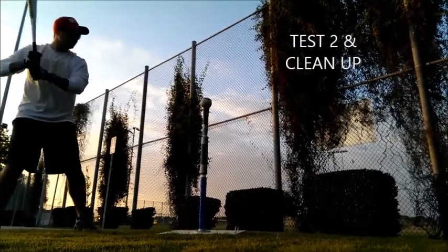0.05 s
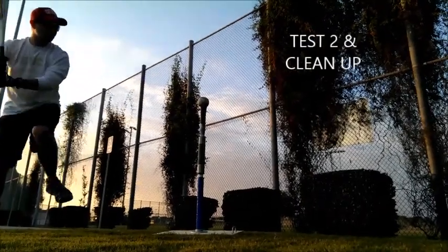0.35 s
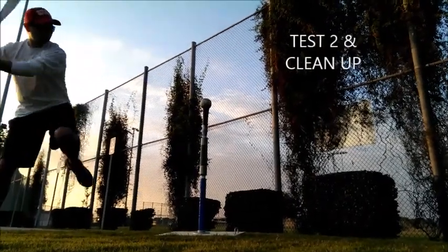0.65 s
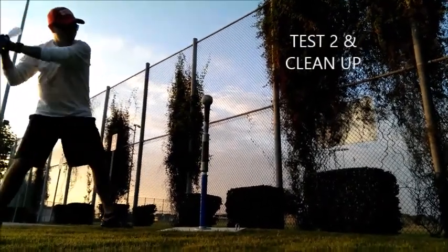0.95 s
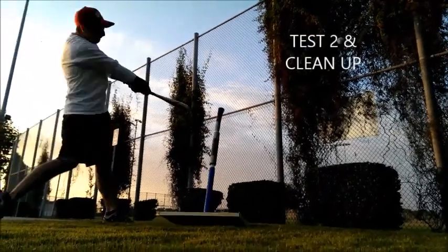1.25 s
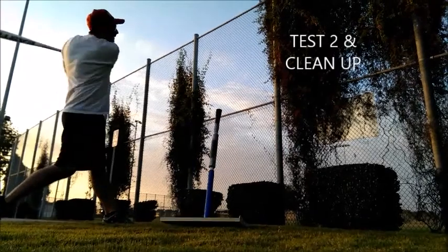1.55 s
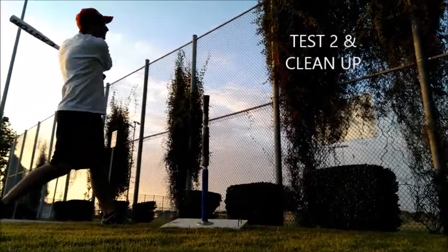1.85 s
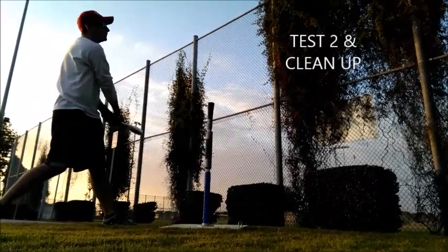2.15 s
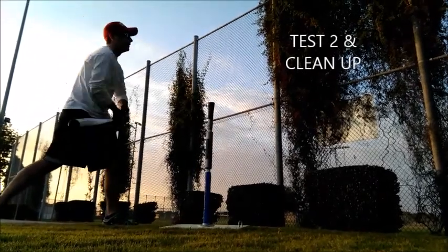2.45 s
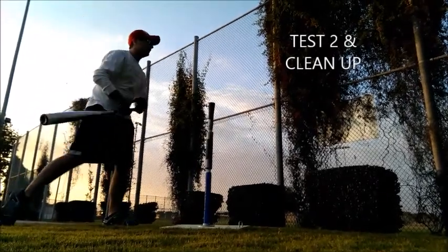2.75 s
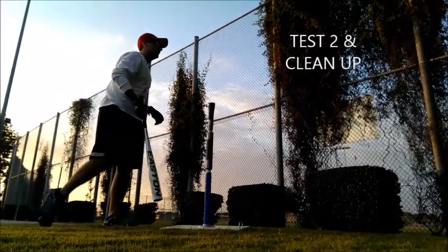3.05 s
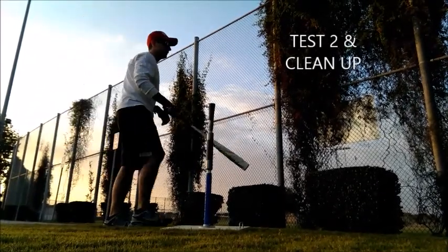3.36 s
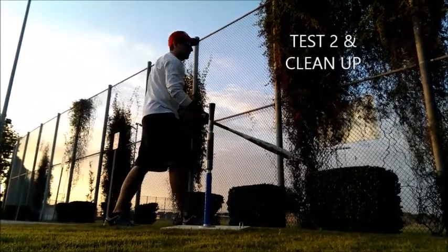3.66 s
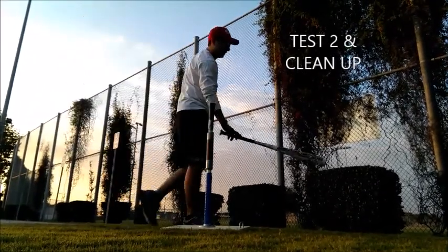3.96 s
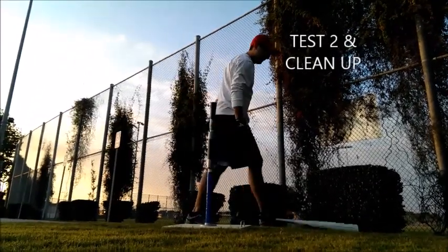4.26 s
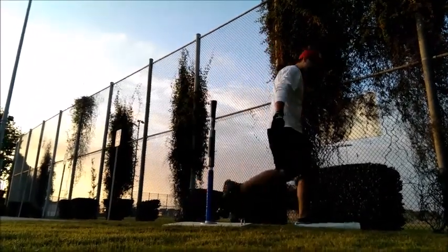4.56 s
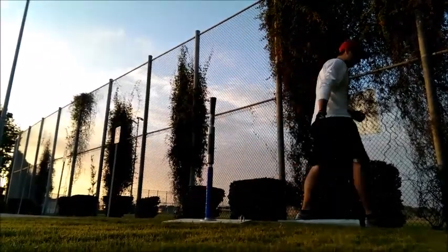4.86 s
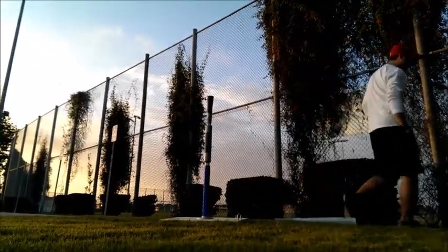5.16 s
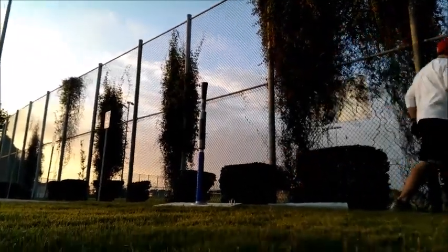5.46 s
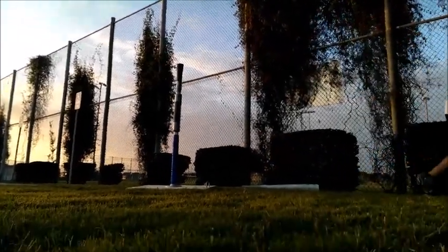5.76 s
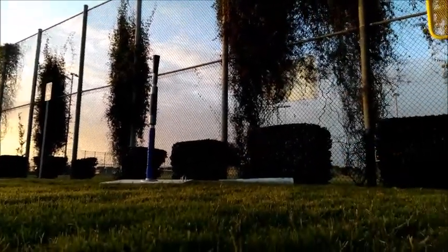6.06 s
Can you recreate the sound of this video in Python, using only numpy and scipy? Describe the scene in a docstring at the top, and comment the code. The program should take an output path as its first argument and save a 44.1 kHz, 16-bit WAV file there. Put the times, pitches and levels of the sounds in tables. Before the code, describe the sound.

A faint rumble of distant traffic runs throughout, heard outdoors from ground level. In the first second, shoes shift quietly on grass and clothing rubs. At about 1.3 seconds a metal bat hits a ball off a tee with a loud, sharp crack and a brief ringing ping. At about 1.6 seconds the ball slams into a chain-link fence, nearly as loud; the mesh chatters and jingles brightly, thinning to a shimmer that dies away by about 2.5 seconds. Leaves and grass rustle faintly afterwards, with tiny ticks. Soft steps swish through the grass from about 2.3 seconds, with one heavier, low thud near 2.6. At about 4.3 seconds the bat drops on the turf with a dull double thud and a very slight ring. A few faint footsteps continue until the end, at around 6 seconds.

```python
"""A sharp crack and ping of a bat, then a slam and jingle of chain-link: batting practice on grass.
The bat knocks a ball off a tee and its barrel rings; the ball drives into a tall fence, whose wire
mesh chatters and settles to a shimmer. The batter swishes through the grass, drops the bat on the turf
and walks off. Leaves rustle and distant traffic rumbles underneath, all heard from ground level."""
import sys
import numpy as np
from scipy import signal
from scipy.fft import rfft, irfft, next_fast_len
from scipy.io import wavfile

SR = 44100
rng = np.random.default_rng(int(sys.argv[2]) if len(sys.argv) > 2 else 0)


def int16_out(signal):
    """Quantize to a 16-bit WAV file."""
    q = np.round(np.clip(np.atleast_2d(signal).T, -1, 1) * 32767)
    wavfile.write(sys.argv[1], SR, q.astype(np.int16))


N = 274302
TIME = np.arange(N) / SR

# ball on the fence, then the mesh slapping back: t/s, level/dB, tilt/(dB per octave)
FENCE_BLOWS = [(1.5773, 4.5, -1), (1.583, -13, 5), (1.5917, -4, -3), (1.6448, -18, -4)]
# bright colour shared by grass, leaves and the fence's shimmer: f/Hz, relative level/dB
RUSTLE_COLOUR = [(1500, -2.5), (3500, -7.5), (6500, -4.5), (8500, -2.5), (10500, -0.5), (12000, -3.5),
                 (13500, -9), (16000, -15)]


def from_db(db):
    """Decibels to gain."""
    return 10 ** (np.asarray(db) / 20)


def rms_one(x):
    """Scale a sound to rms 1."""
    return x / np.sqrt(np.mean(x ** 2) + 1e-20)


def at_hz(points, hz):
    """Read a curve on a log-frequency axis."""
    freqs, values = np.transpose(points)
    return np.interp(np.log(np.maximum(hz, 1)), np.log(freqs), values)


def in_time(points):
    """Join the points of an envelope with straight lines."""
    return np.interp(TIME, *np.transpose(points))


def bins(size):
    """FFT bin frequencies in Hz."""
    return np.arange(size // 2 + 1) * SR / size


def add(out, s, sound):
    """Mix a short sound in at time s."""
    start = int(round(s * SR))
    out[:, start:start + sound.shape[-1]] += sound[..., :N - start]


def drift(rate):
    """Random wander of spread 1, with `rate` turning points a second."""
    knots = rng.standard_normal(8192)
    return np.interp(TIME * rate % 8191, np.arange(8192), knots) * np.sqrt(3 / 2)


def wavering(rate):
    """Amplitude and phase of a tone that reaches each side by many paths."""
    return np.array([drift(rate) + 1j * drift(rate) for side in range(2)]) / np.sqrt(2)


def bell(s, width):
    """An envelope that swells up to time s and falls away again."""
    return np.exp(-.5 * np.minimum(((TIME - s) / width) ** 2, 100))


def dying(start, rise, t60):
    """An envelope that builds from the start and then decays; times in s."""
    age = np.maximum(TIME - start, 0)
    return (1 - np.exp(-age / rise)) * from_db(-60 * age / t60)


def fader(points):
    """Gain that rides a dB curve about its mean."""
    db = in_time(points)
    return from_db(db - db.mean())


def below(x, hz):
    """The part of a sound under one frequency."""
    return signal.sosfiltfilt(signal.butter(2, hz, fs=SR, output="sos"), x)


def noise(colour):
    """Diffuse coloured noise, narrow in the bass and wide in the treble; rms 1."""
    # stereo image of the open air: f/Hz, left-right correlation
    likeness = [(60, 0.94), (130, 0.96), (290, 0.82), (640, 0.315), (1400, 0), (3100, 0), (7000, 0.049),
                (16000, 0)]
    size = next_fast_len(N, real=True)
    hz = bins(size)
    mid, side = rfft(rng.standard_normal((2, size)))
    alike = np.clip(at_hz(likeness, hz), -1, 1)
    stereo = np.sqrt(1 + alike) * mid + np.sqrt(1 - alike) * side * [[1], [-1]]
    low_cut = 1 / np.hypot(1, (colour[0][0] / (hz + 1)) ** 2)
    high_cut = 1 / np.hypot(1, (hz / colour[-1][0]) ** 4)
    return rms_one(irfft(stereo * low_cut * high_cut * from_db(at_hz(colour, hz)), size)[:, :N])


def band_noise(hz, octaves, size=N):
    """Stereo noise around one frequency; rms 1."""
    edges = np.clip([hz / 2 ** (octaves / 2), hz * 2 ** (octaves / 2)], 20, SR * .47)
    band = signal.butter(2, edges, "band", fs=SR, output="sos")
    return rms_one(signal.sosfilt(band, rng.standard_normal((2, size))))


def traffic():
    """A distant road: deep rumble, engine drone and tyre noise, with a wavering engine hum."""
    # colour of the road: f/Hz, relative level/dB
    road_colour = [(13, -56), (22, -27), (30, -22), (41, -9), (75, -2), (91, -2), (113, -2), (172, -4),
                   (242, -4), (347, -10.5), (487, -16.5), (641, -18), (882, -19.5), (1160, -25),
                   (3500, -39.5), (4550, -55), (7700, -120)]
    # fader ride of the rumble: t/s, relative level/dB
    rumble_ride = [(0.0, -53.5), (0.47, -52), (3.5, -52), (3.69, -53.5), (5.51, -49.5), (5.7, -52.5),
                   (6.22, -50)]
    # fader ride of the drone just above it: t/s, relative level/dB
    drone_ride = [(0.0, -48.5), (2.27, -52.5), (2.63, -50.5), (4.19, -49), (4.83, -54.5), (5.46, -53),
                  (6.22, -52.5)]
    road = from_db(-46) * noise(road_colour)
    rumble, engines = below(road, hz=140), below(road, hz=495)
    busy = fader(drone_ride)
    drone = busy * (engines - rumble)
    tyres = busy ** 0.27 * (road - engines)   # follow a share of the drone's swing
    hum_level = from_db(-56.5 + 1.7 * drift(2.8))
    hum_hz = 92.3 + 3 * drift(9)
    hum = hum_level * np.sqrt(2) * np.sin(2 * np.pi * np.cumsum(hum_hz) / SR)
    return fader(rumble_ride) * rumble + drone + tyres + hum


def hiss():
    """A faint, even bed of hiss."""
    return from_db(-67) * noise(colour=[(1800, -0.5), (4000, -5), (9000, -10.5), (16000, -13)])


def chirp():
    """One faint, thin chirp."""
    # a blip of pure tone: t/s, width/s, f/Hz, level/dB
    blip = (4.875, 0.0051, 7050, -69.5)
    s, width, hz, db = blip
    return from_db(db) * bell(s, width) * np.sin(2 * np.pi * hz * TIME)


def snap(hz, t60, size=4096):
    """A stalk gives way, or the bat knocks the turf: a short burst around one pitch."""
    t = TIME[:size]
    attack = 1 - np.exp(-t / (.02 * t60))
    return attack * from_db(-60 * t / t60) * band_noise(hz, octaves=.25, size=size)


def leaves(snaps_per_s=30, low_hz=4200, high_hz=12000):
    """Grass and leaves rustle once the fence is hit, dotted with snapping stalks; a few ticks stand out."""
    # envelope of the rustle: t/s, level/dB
    rustle_ride = [(2.0, -60.5), (2.74, -63), (3.01, -68.5), (3.93, -72.5), (4.19, -64), (4.44, -74),
                   (4.94, -76.5), (6.14, -59.5), (6.22, -60.5)]
    # the loudest snaps and taps in the grass, and a knock of the bat landing at 4.3455 s: t/s, level/dB, f/Hz
    ticks = [(.408, -58, 2800), (2.0664, -52, 9300), (2.278, -54, 3300), (2.579, -53, 10000),
             (2.708, -60, 5000), (2.783, -53, 7100), (3.024, -52, 10500), (3.464, -58, 10100),
             (3.599, -49, 11500), (4.3455, -37, 695), (5.887, -52, 4320), (5.9255, -54, 9700)]
    stirred = dying(FENCE_BLOWS[0][0], rise=0.24, t60=np.inf)
    level = stirred * from_db(in_time(rustle_ride))
    out = level * noise(RUSTLE_COLOUR) * from_db(0.5 + 1.6 * drift(250))
    for s, db, hz in ticks:
        add(out, s, from_db(db) * snap(hz, t60=0.033))
    crackle = np.zeros((2, N))
    for when, pitch, strength in rng.random((int(snaps_per_s * N / SR), 3)):
        hz = low_hz * (high_hz / low_hz) ** pitch
        add(crackle, when * TIME[-1], from_db(-9 + 10 * strength) * snap(hz, t60=.02))
    return out + level * crackle


def footwork():
    """Each step swishes through the blades while the sole scuffs beneath; clothes rub; all is gritty."""
    # shoes in the stance, swing and walk away: t/s, width/s, swish level/dB, scuff level/dB
    steps = [(.09, 0.012, -68, -68), (.175, 0.024, -64.5, -68), (.47, 0.021, -71, -69),
             (.91, 0.045, -68.5, -66.5), (1.10, 0.031, -67, -69), (1.26, 0.039, -66.5, -69),
             (2.27, .023, -60, -63.5), (2.43, 0.044, -62.5, -65.5), (2.59, 0.0177, -60, -65),
             (2.69, 0.039, -63, -61.5), (2.80, 0.013, -62, -61), (2.91, 0.038, -62.5, -67),
             (3.035, .014, -63, -77), (3.31, 0.041, -65.5, -66), (3.595, 0.02, -64, -78),
             (4.035, 0.034, -61, -60), (4.345, 0.029, -60, -72), (4.68, .03, -68.5, -79),
             (5.02, .035, -66, -79), (5.56, 0.0275, -65, -81), (6.1, .07, -70, -67)]
    # clothes rubbing in the wind-up: t/s, width/s, f/Hz, level/dB
    rubs = [(.37, 0.031, 3020, -66.5), (.42, 0.015, 2640, -56.5), (.795, .006, 1500, -56)]
    swish = sum(from_db(db) * bell(s, width) for s, width, db, _ in steps) * noise(RUSTLE_COLOUR)
    scuff = sum(from_db(db) * bell(s, width) for s, width, _, db in steps) * band_noise(4070, octaves=1)
    cloth = sum(from_db(db) * bell(s, width) * band_noise(hz, octaves=0.72) for s, width, hz, db in rubs)
    return swish * from_db(1.7 * drift(250)) + (scuff + cloth) * from_db(2.5 * drift(260))


def turf_thuds():
    """Soft turf gives way in about two cycles and leaves a short, low ring."""
    # the struck tee, a heavy step and the bat landing: t/s, level/dB, f/Hz, t60/s
    thuds = [(1.3001, -32.5, 158, 0.028), (2.5736, -24.5, 268.4, 0.0233), (4.326, -31.5, 170, 0.019),
             (4.3448, -25.5, 240, 0.026)]
    out, t = np.zeros((2, N)), TIME[:4096]
    for s, db, hz, t60 in thuds:
        tone = np.sin(2 * np.pi * hz * t)
        punch = -tone * (t * hz) ** 2 * from_db(-120 * t / t60) * np.exp(-t * hz / 2.9)
        ground = tone * from_db(-60 * t / .07 - 15)
        add(out, s, from_db(db) * (punch / np.abs(punch).max() + ground))
    return out


def metal_pings():
    """Bat barrel and fence ring in narrow tones; the bat's ping comes up just after the crack,
    as if a limiter lets go, then wavers away."""
    # pings: t/s, f/Hz, level/dB, time to peak/s, peak width/s, relative tail level/dB, t60/s
    tones = [(1.2975, 2395, -23, 0.034, 0.011, -21.5, 0.38), (1.2975, 5060, -33.5, 0.0236, 0.0031, -8, .12),
             (1.2975, 3258, -37, 0.0206, 0.0054, -12, .12), (1.5775, 4150, -37, 0.054, 0.018, -9, 0.31),
             (1.5775, 4290, -43, .055, .012, -9, .2), (1.6445, 4130, -49, 0.049, 0.014, -15, .2),
             (1.5775, 3870, -40, 0.028, 0.016, -12, .2), (1.5775, 2960, -48, .015, .015, -9, .2),
             (4.3455, 1377, -64.5, 0.037, 0.024, -5, .2)]
    out = np.zeros((2, N))
    for s, hz, db, delay, width, tail_db, t60 in tones:
        peak = (TIME > s) * bell(s + delay, width)
        tail = from_db(tail_db) * dying(s + delay / 2, rise=width, t60=t60) * wavering(110)
        out += np.sqrt(2) * from_db(db) * np.real((peak + tail) * np.exp(2j * np.pi * hz * TIME))
    return out


def pulse(colour, tilt_db, size):
    """A tight pressure pulse of about three cycles, its colour tilted by tilt_db per octave; energy 1."""
    hz = bins(size) + 30
    cepstrum = irfft(np.log(from_db(at_hz(colour, hz) + tilt_db * np.log2(hz))))
    cepstrum[1:size // 2] *= 2   # minimum phase packs the energy into the attack
    cepstrum[size // 2 + 1:] = 0
    wave = irfft(np.exp(rfft(cepstrum)))
    for centre_hz in (2800, 5500):
        _, poles = signal.iirpeak(centre_hz, 1, fs=SR)
        wave = signal.lfilter(poles[::-1], poles, wave)   # an all-pass delays the middle pitches
    return rms_one(wave) / np.sqrt(size)


def cracks(blows, colour, scatter_t60, left_lag_ms, scatter_db=-6, size=2048):
    """Each blow is one pressure pulse, trailed by a few ms of scatter from the things around it."""
    out, t = np.zeros((2, N)), TIME[:size]
    envelope = np.minimum(t / .0012, 1) * from_db(-60 * t / scatter_t60)
    scatter_gain = from_db(scatter_db)
    for s, db, tilt_db in blows:
        paths = scatter_gain * rms_one(rng.standard_normal((2, size)) * envelope) / np.sqrt(size)
        paths[0, int(left_lag_ms * SR / 1000)] += 1   # the direct sound reaches the left side later
        paths[1, 0] += 1
        crack = signal.fftconvolve(paths, pulse(colour, tilt_db, size)[None], axes=1)
        add(out, s, from_db(db) * crack / np.hypot(1, scatter_gain))
    return out


def fence_hit():
    """The ball cracks on the fence; links chatter as it pushes into the mesh, then thin to a shimmer."""
    # colour of the impact: f/Hz, relative level/dB
    crack_colour = [(100, -36), (600, -21), (1500, -17.5), (2300, -19), (2900, 3), (4300, -2), (5500, -2.5),
                    (6500, -15), (9000, -13), (12000, -14.5), (16000, -20)]
    # colour of the chattering links: f/Hz, relative level/dB
    mesh_colour = [(300, -13.5), (560, -7), (900, -12.5), (2200, -15), (2700, -2.5), (4200, 0.5),
                   (5500, -5.5), (6500, -6), (8500, -0.5), (11600, 1), (13000, -6.5), (16000, -21)]
    # clearest tones of the wires: f/Hz, relative level/dB
    wire_tones = [(3945, -16.5), (4064, -12.5), (7356, -20), (8103, -22), (8969, -19), (9760, -25),
                  (10036, -22), (10155, -20), (10800, -17), (11236, -17), (11710, -19)]
    crack = cracks(FENCE_BLOWS, crack_colour, scatter_t60=0.012, left_lag_ms=0.22)
    push = from_db(-24.5) * dying(1.578, rise=.002, t60=0.39)
    rebound = from_db(-28) * dying(1.608, rise=0.017, t60=0.24)
    chatter = np.hypot(push, rebound) * from_db(1.2 * drift(220))
    shimmer = from_db(-41) * dying(1.584, rise=0.027, t60=1.13) * from_db(0.84 * drift(90))
    wires = np.zeros((2, N))
    for hz, db in wire_tones:   # each wire is kept ringing by the chatter
        tone = np.cos(2 * np.pi * (hz * TIME[:SR] + rng.random((2, 1))))
        add(wires, FENCE_BLOWS[0][0], from_db(db) * np.sqrt(2) * tone)
    jingle = noise(mesh_colour) + wires * from_db(0.5 + 2.7 * drift(48.57))
    return crack + jingle * chatter + noise(RUSTLE_COLOUR) * shimmer


def bat_hit():
    """The bat cracks on the ball; scatter comes back from fence and hedges, then a faint far tail."""
    # bat on ball, the tee knocked about, and the crack thrown back off the fence at 1.3195 s: t/s, level/dB,
    # tilt/(dB per octave)
    blows = [(1.2973, 5.5, 0), (1.2997, -5.5, 2), (1.3038, -7.5, -3.5), (1.3079, -9, 0), (1.3195, -6.5, 3),
             (1.4282, -24.5, 0.5)]
    # colour of the impact: f/Hz, relative level/dB
    crack_colour = [(100, -16), (350, -1.5), (590, 2), (760, -13.5), (1100, -1), (1500, -6.5), (2400, 1.5),
                    (3300, -1.5), (3900, -5.5), (5000, 2), (6200, 2), (7000, -18), (9200, -11),
                    (16000, -25)]
    # colour of its tail: f/Hz, relative level/dB
    tail_colour = [(200, -8), (900, -6.5), (1900, 0.5), (3200, 3.5), (4000, -2.5), (5100, 1), (6500, -1),
                   (10500, -2.5), (13000, -6), (16000, -19)]
    crack = cracks(blows, crack_colour, scatter_t60=0.017, left_lag_ms=.07)
    near = from_db(-25) * dying(1.298, rise=0.00093, t60=0.1)
    returned = from_db(-24) * dying(1.317, rise=0.0087, t60=0.17)
    far = from_db(-42.5) * dying(1.326, rise=0.0207, t60=0.63)
    tail = np.sqrt(near ** 2 + returned ** 2 + far ** 2)
    return crack + noise(tail_colour) * tail * from_db(1.2 * drift(300))


def scene():
    """The two hits up front, the batter moving about, and the outdoor bed behind."""
    hits = bat_hit() + fence_hit() + metal_pings()
    return hits + turf_thuds() + footwork() + leaves() + traffic() + hiss() + chirp()


def record(dry, cutoff_hz=15750):
    """The right microphone port resonates in the treble; a steep low-pass cuts the very top."""
    # balance of the two ports: f/Hz, left minus right level/dB
    port_balance = [(60, -3.5), (200, -3), (700, -0.5), (1300, -0.5), (2400, -3.5), (3800, -1.5),
                    (6000, -4.5), (8200, -11.5), (10500, -13.5), (12300, -6), (16000, -1)]
    size = next_fast_len(N + 2048, real=True)
    ports = from_db(at_hz(port_balance, bins(size)) * np.array([[.5], [-.5]]))
    heard = irfft(rfft(dry, size) * ports, size)[:, :N]
    return signal.sosfilt(signal.ellip(10, .2, 80, cutoff_hz, fs=SR, output="sos"), heard)


dry = scene()
out = record(dry)
int16_out(out)
```